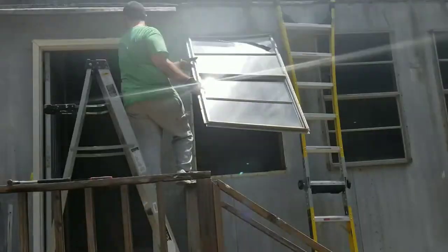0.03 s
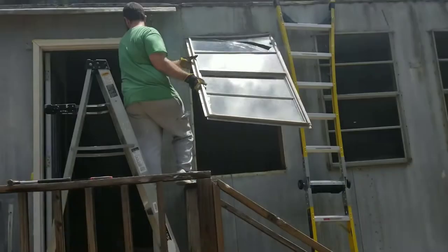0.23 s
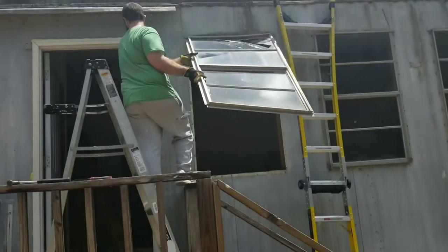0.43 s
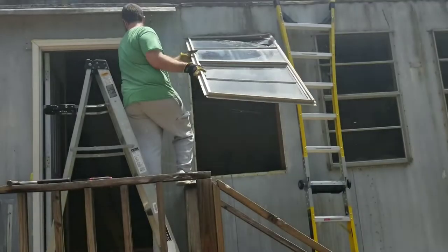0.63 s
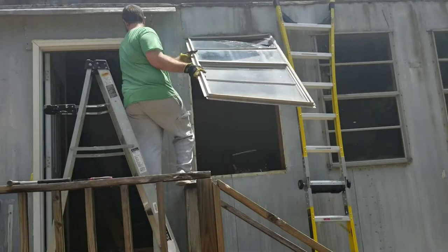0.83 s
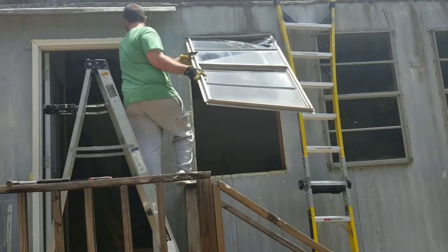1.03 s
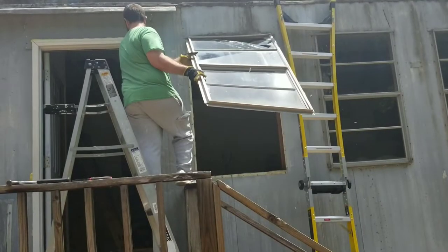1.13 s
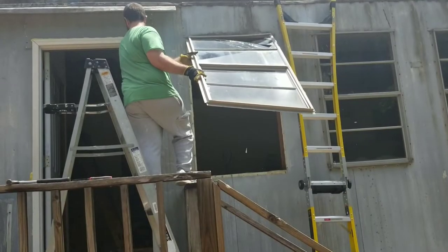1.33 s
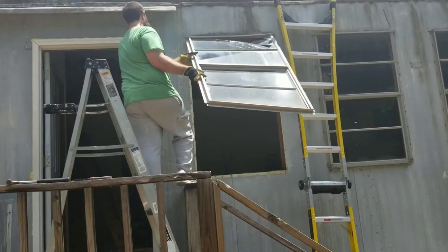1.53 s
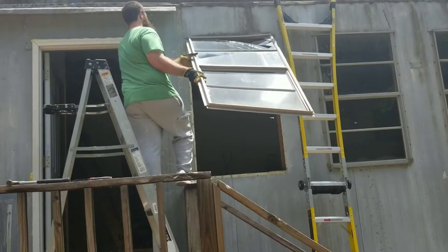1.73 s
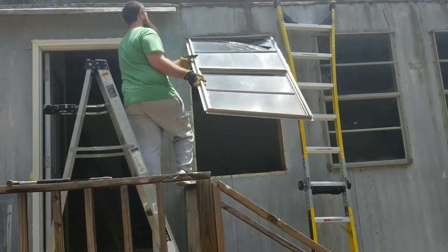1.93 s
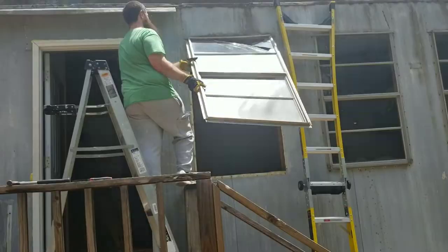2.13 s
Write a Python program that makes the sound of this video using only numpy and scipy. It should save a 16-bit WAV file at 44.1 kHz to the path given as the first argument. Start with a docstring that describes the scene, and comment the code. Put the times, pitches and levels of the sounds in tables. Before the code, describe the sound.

Window glass bursts as its frame knocks, followed by scattered clinks of falling pieces.

```python
"""A window sash is wrenched out of a house wall, a little left of a stereo microphone in the yard.
The glass ticks faintly, then a quarter second in the frame knocks, the sash shudders and the pane
bursts, cracking in several goes over the next half second. Shards fall, clink and bounce on the
sill and floor amid a trickle of splinters, thinning out to a last tap at about two seconds.
The wall throws back a short tail, and a quiet outdoor hum lies under it all."""
import sys
import numpy as np
from scipy import signal
from scipy.fft import rfft, irfft, next_fast_len
from scipy.io import wavfile

SR = 44100
rng = np.random.default_rng(int(sys.argv[2]) if len(sys.argv) > 2 else 0)


def dump_mix(stems):
    """Bounce the given channels to the path in sys.argv[1] as a 16-bit WAV at rate SR."""
    frames = np.atleast_2d(stems).T  # one column per channel
    limited = np.clip(frames, -1, 1)  # hard clip at full scale
    pcm = np.round(limited * 32767).astype(np.int16)
    wavfile.write(sys.argv[1], SR, pcm)


N = 97020
T = np.arange(int(.7 * SR)) / SR  # time within one event, in seconds

# Glass cracks or lands: start_s, snap_db, crunch_db, crunch_t60_s, tilt_db_per_octave
CRACKS = [(.001, -46, -46.5, 0.27, 5.5), (0.1627, -42, -33, 0.092, 6.5), (.212, -42, -32, 0.15, 3),
          (0.2243, -36, -28.5, 0.2, -0.5), (0.2335, -9, -13.5, 0.083, -2), (.242, -15, -14, 0.22, 2),
          (0.2724, -27, -22, 0.17, -1), (0.2941, -10.5, -15.5, 0.11, 0.5), (0.3366, -12, -19, 0.1, 1),
          (.3753, -27, -24.5, 0.091, -7.5), (.3801, -24.5, -19, .14, -0.5), (0.418, -51, -31.5, 0.066, -1),
          (0.4311, -17.5, -26, 0.15, 1.5), (.442, -18.5, -31, 0.085, 0), (0.4802, -11.5, -18, 0.092, 1),
          (.487, -23, -16.5, 0.15, -3), (0.5, -9, -19, 0.19, 8), (0.575, -33, -37, 0.11, 1),
          (.5957, -9, -19.5, 0.033, 4.5), (0.6098, -21, -20.5, 0.15, 4), (.772, -53, -35, 0.069, -6.5),
          (.78, -8, -18, 0.1, 5), (0.922, -44, -43, 0.17, 1.5), (0.9609, -42, -32.5, 0.18, -2),
          (1.0793, -33.5, -42, 0.18, 0), (1.2, -55, -43, 0.89, 14), (1.2154, -36, -40, 0.17, -1.5),
          (1.2965, -32, -33, 0.19, 14), (1.3066, -32, -41, 0.19, 0), (1.3268, -36, -31.5, .11, 4.5),
          (1.5135, -41, -37, 0.17, 1), (1.5531, -55, -45, 0.18, 3), (1.5827, -50, -39.5, 0.11, 3),
          (1.735, -34, -34.5, 0.15, 2.5), (1.803, -33, -42.5, 0.19, -5.5), (2.108, -58, -48, 0.18, 0)]
# Spectrum of breaking glass: frequency_hz, level_db
GLASS_SPECTRUM = [(30, -25.5), (160, -6), (400, -6), (1000, -3), (2200, -2), (4000, -0.5), (6500, -0.5),
                  (9000, -5), (12500, -8), (15500, -10)]
# Modes of each named shard, lowest first: pitch_hz, level_db, t60_s
SHARD_MODES = { "chip": [(6935, 0, .15)], "flake": [(10465, 0, .19)], "sliver": [(14350, 0, .09)],
               "splinter": [(14620, 0, .11)], "pane": [(4492, 0, .2), (6059, 0, .2), (7010, 1, .16),
               (7117, 0, .16), (7318, 0, .14)], "strip": [(4959, -3, .35), (5005, 0, .35), (5363, -3, .3),
               (5604, 0, .33), (5720, -3, .25), (12850, 7, .07)], "wedge": [(5048, -15, .4),
               (13390, 0, .07)], "plate": [(1717, -14, .5), (3381, -16, .3), (4054, -10, .22),
               (4360, -3, .24), (5355, -6, .27), (5620, -11, .3), (6760, -6, .22), (7340, -6, .25),
               (7624, -2, .24), (8512, -2, .19), (9025, 2, .21), (9630, -4, .2), (11285, -3, .22),
               (12740, -1, .2), (13362, 1, .15), (14190, 2, .16), (15570, -5, .17)],
               "blade": [(3000, -22, .55), (3363, -16, .35), (4150, 0, .3), (5518, -11, .17),
               (5600, -15, .3), (7015, -5, .17), (7365, -7, .19), (8222, -10, .28), (8730, -1, .1),
               (9807, -9, .2), (10669, 3, .17), (10845, -7, .2), (12215, -1, .19), (12795, -7, .21),
               (14575, 7, .075), (15220, -6, .2)], "spike": [(3800, -11, .25), (5879, -3, .22),
               (6794, -3, .22), (10040, -2, .2), (13730, 0, .14)], "slab": [(2210, 0, .08)]}
# A shard is struck and rings until it touches down: start_s, shard, level_db, airborne_s
CLINKS = [(.294, "pane", -33, .2), (.515, "strip", -35, .02), (.5418, "strip", -38, .06),
          (.5958, "chip", -18, .001), (.5958, "flake", -19, .01), (.5958, "sliver", -22, .005),
          (.6097, "chip", -26, .015), (.6097, "flake", -21, .01), (.638, "flake", -32, .12),
          (.652, "splinter", -31, .06), (.7304, "chip", -36, .02), (.7497, "chip", -31, .03),
          (.741, "sliver", -30, .02), (.772, "sliver", -29, .005), (.7805, "plate", -29.5, .14),
          (.896, "splinter", -28, .002), (.964, "sliver", -34, .02), (.9753, "chip", -37, .02),
          (.98, "flake", -45, .1), (.9753, "slab", -31, .03), (1.0158, "wedge", -35, .06),
          (1.0158, "splinter", -36, .001), (1.0795, "flake", -39, .04), (1.12, "chip", -44, .05),
          (1.237, "chip", -37, .05), (1.3277, "flake", -42, .04), (1.4395, "splinter", -31, .002),
          (1.5139, "sliver", -38, .015), (1.611, "spike", -49, .06), (1.7207, "wedge", -38, .005),
          (1.7365, "blade", -29.5, .2), (1.8565, "blade", -49, .08)]
# Short band-limited glass hits, from cracks and landing pieces: start_s, level_db, low_hz, high_hz
GLASS_HITS = [(.4655, -31.5, 3660, 6540), (.48, -12.5, 2150, 4590), (0.609, -10.5, 5430, 7960),
              (0.6503, -20, 4270, 9200), (0.726, -29.5, 1200, 7450), (0.7323, -23.5, 3000, 15600),
              (.742, -34, 3280, 7100), (.7497, -25, 2790, 6150), (0.9753, -22.5, 1760, 7100),
              (1.015, -27.5, 12600, 15300), (1.127, -35, 870, 4200), (1.238, -29, 1480, 6150),
              (1.374, -34.5, 2500, 12000), (1.419, -37.5, 1390, 3600), (1.439, -34.5, 3520, 8160),
              (1.503, -33.5, 2200, 6100), (1.688, -38, 1830, 4100), (1.858, -32.5, 8000, 15300),
              (1.8996, -41.5, 1600, 3490), (2.108, -43, 3020, 15000)]
# Blows on the frame: start_s, level_db, rattle_t60_s, centre_hz
FRAME_KNOCKS = [(.2341, -13, 0.072, 635), (.3749, -33.5, 0.23, 550), (.485, -32, 0.1, 663),
                (.7795, -29, 0.088, 730), (.93, -52, 0.33, 510), (1.126, -28.5, 0.037, 745),
                (1.24, -54, 0.54, 540), (1.56, -60, 0.49, 370), (2.1095, -41.5, 0.037, 810)]
# Modes of the frame: pitch_hz, level_db, t60_s
FRAME_MODES = [(290, -1, .14), (470, -3, .1), (590, -3, .06), (669, 0, .08), (734, -1, .07), (820, 2, .07),
               (973, -1, .06), (1080, -3, .05), (1270, -2, .05), (1640, -1, .05)]
# The sash shudders against the wall: start_s, level_db, rattle_t60_s, centre_hz
SASH_THUMPS = [(.2341, -27.5, 0.48, 180), (.255, -29, 0.28, 63), (.3749, -24.5, 0.22, 120),
               (.4177, -30, 0.34, 65), (.487, -32, 0.22, 163), (.5958, -37, 0.068, 79),
               (.93, -56.5, 1, 204), (1.2, -53.5, 0.71, 231), (1.725, -48, 0.54, 228.7)]
# Modes of the sash: pitch_hz, level_db, t60_s
SASH_MODES = [(64, 2, .25), (88, -4, .15), (122, -3, .12), (163, -1, .15), (209, -2, .16), (265, -2, .1)]
# Loudness of the falling splinters: time_s, level_db
TRICKLE_LEVELS = [(0, -79), (.15, -63), (.3, -83), (.55, -52), (.7, -47.5), (.88, -48), (1.05, -58.5),
                  (1.18, -61), (1.331, -49.5), (1.48, -58), (1.6, -65), (1.68, -52.5), (1.84, -56.5),
                  (1.948, -62), (2.05, -85), (2.2, -87)]
# Spectrum of the hum in the yard: frequency_hz, level_db
AIR_SPECTRUM = [(20, -9.5), (45, -13.5), (65, -2.5), (120, 0.5), (250, -10.5), (500, -27), (1000, -30.5),
                (3000, -34.5), (8000, -21), (16000, -25)]
# How alike the two sides of the microphone are: frequency_hz, correlation
STEREO_LIKENESS = [(100, 0.94), (500, 0.94), (1000, 0.86), (2500, 0.49), (6000, 0.43), (14000, 0.48)]
# Balance at the microphone: frequency_hz, left_minus_right_db
LEFT_BALANCE = [(100, 1.5), (600, 3), (2500, 2.5), (8000, 3), (14000, 7.5)]


def from_db(db):
    """Decibels to gain."""
    return 10 ** (np.asarray(db) / 20)


def unit_rms(x):
    """Scale to rms 1."""
    return x / np.sqrt(np.mean(x ** 2) + 1e-20)


def as_loud(x, envelope):
    """Give a sound the energy of an rms envelope."""
    return unit_rms(x) * np.sqrt(np.mean(envelope ** 2))


def at_hz(points, hz):
    """Read a table on a log-frequency axis."""
    frequencies, values = np.transpose(points)
    return np.interp(np.log(hz), np.log(frequencies), values)


def fade(t60_s, hold_s=0):
    """Hold, then fall by 60 dB in t60_s."""
    return np.exp(-np.log(1000) * np.maximum(T - hold_s, 0) / t60_s)


def onset(rise_s):
    """Exponential rise from 0 to 1."""
    return 1 - np.exp(-T / rise_s)


def noise(size=len(T)):
    """Two unrelated white noises."""
    return rng.standard_normal((2, size))


def butter(x, order, hz, kind):
    """Butterworth filter."""
    return signal.sosfilt(signal.butter(order, hz, kind, fs=SR, output="sos"), x)


def add(out, start_s, x):
    """Mix an event in at its start time."""
    i = int(start_s * SR)
    out[..., i:i + len(T)] += x[..., :N - i]


def colour(x, spectrum, tilt_db=0):
    """Causal filter with a given spectrum, tilted by tilt_db per octave above 1800 Hz."""
    n = 2 * next_fast_len(x.shape[-1])
    hz = np.fft.rfftfreq(n, 1 / SR) + 1
    gain_db = at_hz(spectrum, hz) + tilt_db * np.log2(np.maximum(hz, 1800) / 4000)
    cepstrum = irfft(np.log(from_db(gain_db)))
    cepstrum[1:n // 2] *= 2  # fold onto positive time for minimum phase
    cepstrum[n // 2 + 1:] = 0
    return irfft(rfft(x, n) * np.exp(rfft(cepstrum)))[..., :x.shape[-1]]


def widen(pair):
    """Two unrelated signals become left and right, alike in the bass and less so in the treble."""
    mid, side = rfft(pair)
    alike = at_hz(STEREO_LIKENESS, np.linspace(1, SR / 2, len(mid)))
    mid, side = mid * np.sqrt((1 + alike) / 2), side * np.sqrt((1 - alike) / 2)
    return irfft([mid + side, mid - side], pair.shape[-1])


def chips(per_s, spread_db, size=len(T)):
    """Two random trains of tiny clicks of uneven size."""
    shape = (2, size)
    clicks = (rng.random(shape) < per_s / SR) * rng.choice([-1, 1], shape)
    return clicks * from_db(spread_db * np.minimum(rng.exponential(1, shape), 4))


def ring(hz, t60_s, waver=1):
    """One decaying mode."""
    return np.sqrt(2) * np.real(waver * np.exp(2j * np.pi * hz * T)) * fade(t60_s)


def glass_cracks(fragment_t60_s=.045, fragment_db=-2):
    """Each break is a snap, a dying crunch of chips and brief rings of fresh fragments."""
    out = np.zeros((2, N))
    for start_s, snap_db, crunch_db, crunch_t60_s, tilt_db in CRACKS:
        snap_shape = fade(t60_s=.011)
        crunch_shape = fade(crunch_t60_s) * onset(rise_s=.0019)
        snap = colour(noise() * snap_shape, GLASS_SPECTRUM, tilt_db)
        crunch = colour(chips(per_s=3000, spread_db=2) * crunch_shape, GLASS_SPECTRUM, tilt_db)
        pitches_hz = rng.uniform(2000, 15500, (2, 8))
        rings = np.array([sum(ring(hz, fragment_t60_s) for hz in row) for row in pitches_hz])
        rings = as_loud(colour(rings, GLASS_SPECTRUM, tilt_db), fade(fragment_t60_s))
        debris = as_loud(crunch, crunch_shape) + from_db(fragment_db) * rings
        add(out, start_s, from_db(snap_db) * as_loud(snap, snap_shape) + from_db(crunch_db) * debris)
    return widen(out)


def shard_clinks(chatter_db=-8.5, chatter_octaves=.22):
    """Struck shards chatter on what they hit and ring in their modes until touching down damps them."""
    out = np.zeros((2, N))
    chatter_shape = fade(t60_s=.026)
    for start_s, shard, level_db, airborne_s in CLINKS:
        envelope = onset(rise_s=.0009) * fade(t60_s=.14, hold_s=airborne_s)
        for hz, mode_db, t60_s in SHARD_MODES[shard]:
            add(out, start_s, from_db(level_db + mode_db) * ring(hz, t60_s, tumble(hz)) * envelope)
        top_mode_hz = SHARD_MODES[shard][-1][0]
        band_hz = top_mode_hz * 2 ** (chatter_octaves * np.array([-1, 1]))
        chatter = butter(noise() * chatter_shape, 1, band_hz, "band")
        add(out, start_s, from_db(level_db + chatter_db) * as_loud(chatter, chatter_shape))
    return out


def tumble(pitch_hz, flutter_above_hz=10500, rate_hz=80):
    """A tumbling shard wavers in level and phase, differently on each side, more for short waves."""
    depth = (pitch_hz / flutter_above_hz) ** 2
    white = noise(2 * len(T)) + 1j * noise(2 * len(T))
    wander = butter(white, 2, rate_hz, "low")[:, len(T):]
    return (1 + depth * wander / np.std(wander)) / np.hypot(1, depth)


def glass_hits(grit_db=-12):
    """Short band-limited hits: the sharp bite of two loud cracks, and lighter ticks of landing pieces."""
    out = np.zeros((2, N))
    envelope = np.hypot(fade(t60_s=.02), from_db(grit_db) * fade(t60_s=.078))  # tick, then gritty decay
    for start_s, level_db, low_hz, high_hz in GLASS_HITS:
        hit = butter(noise() * envelope, 3, [low_hz, high_hz], "band")
        add(out, start_s, from_db(level_db) * as_loud(hit, envelope))
    return widen(out)


def window_rattle(blows, modes, falloff_db_per_octave=15):
    """Each blow is a dying burst of contacts that rings frame or sash, most of all near centre_hz."""
    out = np.zeros((2, N))
    for start_s, level_db, rattle_t60_s, centre_hz in blows:
        contacts = noise() * fade(rattle_t60_s)
        body = 0
        for hz, mode_db, t60_s in modes:
            mode = signal.fftconvolve(contacts, ring(hz, t60_s)[None], axes=1)[:, :len(T)]
            gain = from_db(mode_db - falloff_db_per_octave * abs(np.log2(hz / centre_hz)))
            body = body + gain * np.array([unit_rms(channel) for channel in mode])
        add(out, start_s, from_db(level_db) * as_loud(body, fade(rattle_t60_s)))
    return widen(out)


def splinter_trickle():
    """Fine splinters patter down between the larger pieces."""
    patter = colour(chips(per_s=1300, spread_db=4, size=N), GLASS_SPECTRUM)
    level_db = np.interp(np.arange(N) / SR, *np.transpose(TRICKLE_LEVELS))
    return unit_rms(widen(patter)) * from_db(level_db)


def wall_tail(x):
    """Dense, short reflections reach the yard from the wall, the porch and the room behind."""
    echoes = widen(noise()) * fade(t60_s=.31) * onset(rise_s=.0027)
    return signal.fftconvolve(x, unit_rms(echoes) / np.sqrt(len(T)), axes=1)[:, :N]


def yard_air(level_db=-63):
    """A steady, low outdoor hum around the microphone."""
    return from_db(level_db) * unit_rms(widen(colour(noise(N), AIR_SPECTRUM)))


def at_microphone(x, left_lag_s=.00002):
    """The left side is louder, most of all in the top treble, and a hair later."""
    hz = np.linspace(1, SR / 2, N + 1)
    balance = from_db(at_hz(LEFT_BALANCE, hz) * np.array([[.5], [-.5]]))
    spectrum = rfft(x, 2 * N) * balance
    spectrum[0] *= np.exp(-2j * np.pi * hz * left_lag_s)
    return irfft(spectrum)[:, :N]


def scene():
    """From the yard: glass and frame a little to the left, their tail off the wall, quiet air."""
    impacts = glass_cracks() + glass_hits() + window_rattle(FRAME_KNOCKS, FRAME_MODES)
    clinks = shard_clinks()
    tail = wall_tail(from_db(-12) * impacts + from_db(-8.5) * clinks)
    air = yard_air()
    shudder = window_rattle(SASH_THUMPS, SASH_MODES)
    return at_microphone(impacts + clinks + shudder + splinter_trickle() + tail + air)


def record(dry, low_cut_hz=18, high_cut_hz=16000):
    """After the microphone the deepest bass is cut, peaks clip at full scale and the top is cut."""
    clipped = np.clip(butter(dry, 2, low_cut_hz, "high"), -1, 1)
    return signal.sosfilt(signal.ellip(10, .1, 70, high_cut_hz, fs=SR, output="sos"), clipped)


dry = scene()
out = record(dry)
dump_mix(out)
```